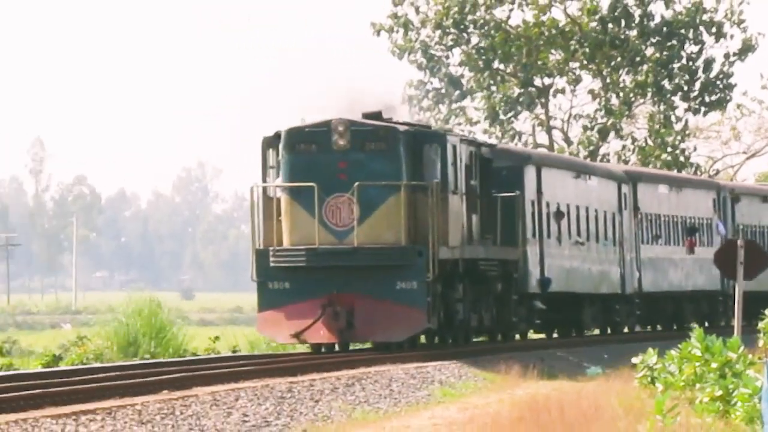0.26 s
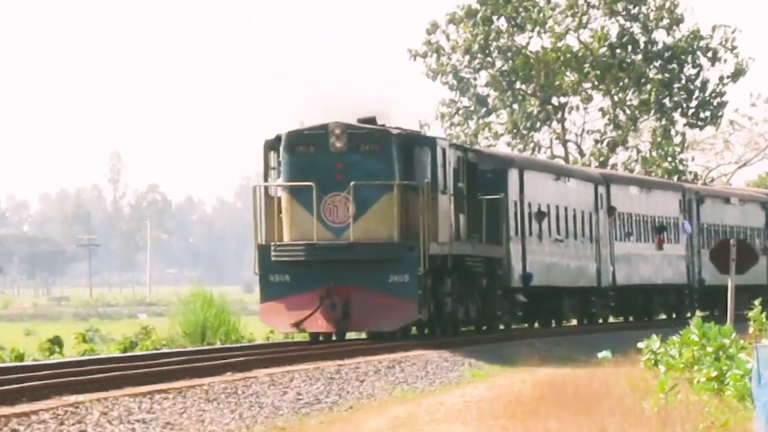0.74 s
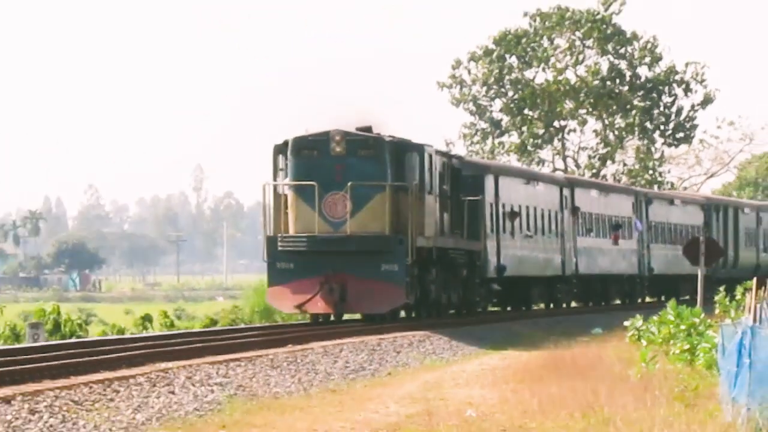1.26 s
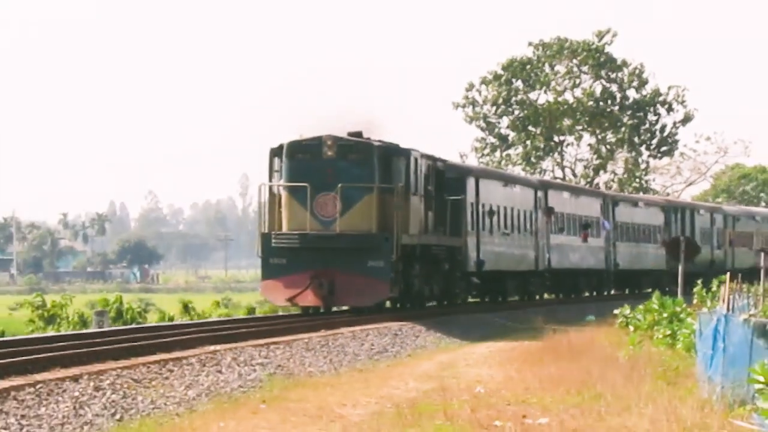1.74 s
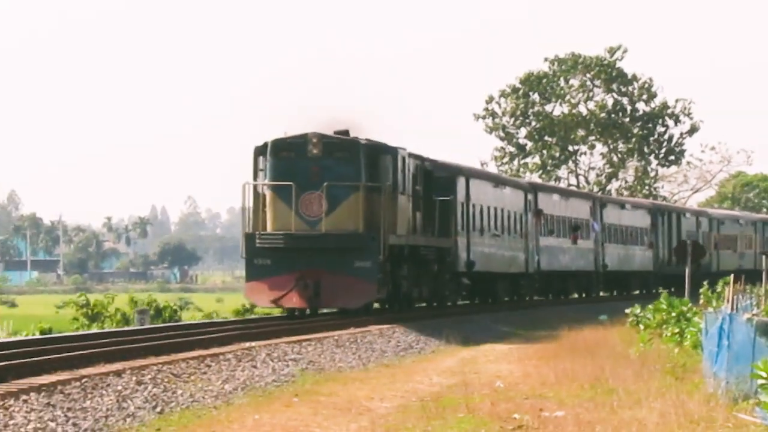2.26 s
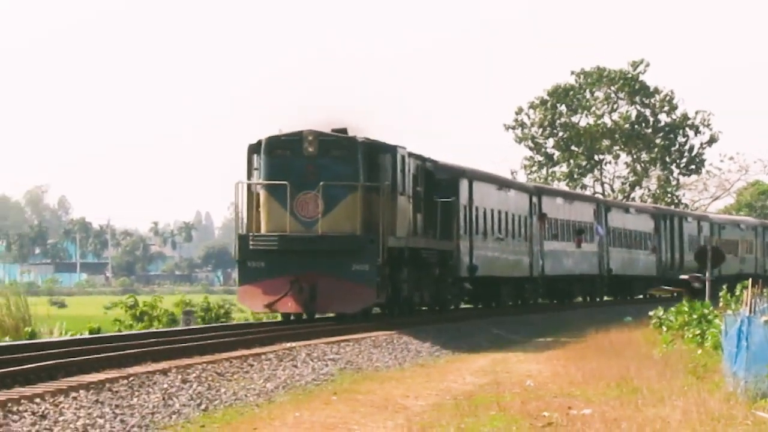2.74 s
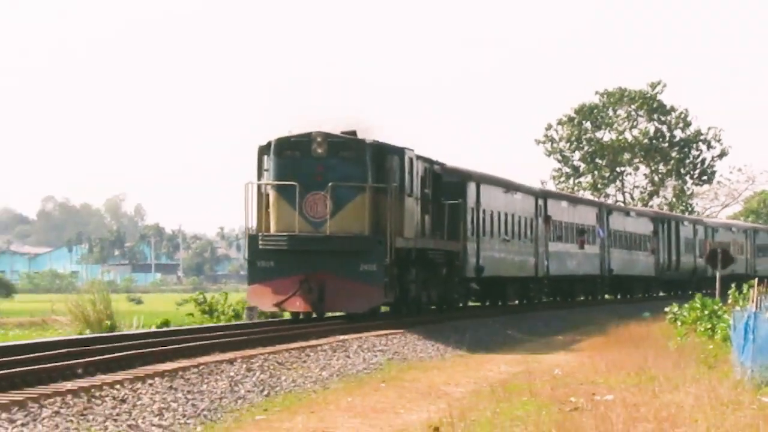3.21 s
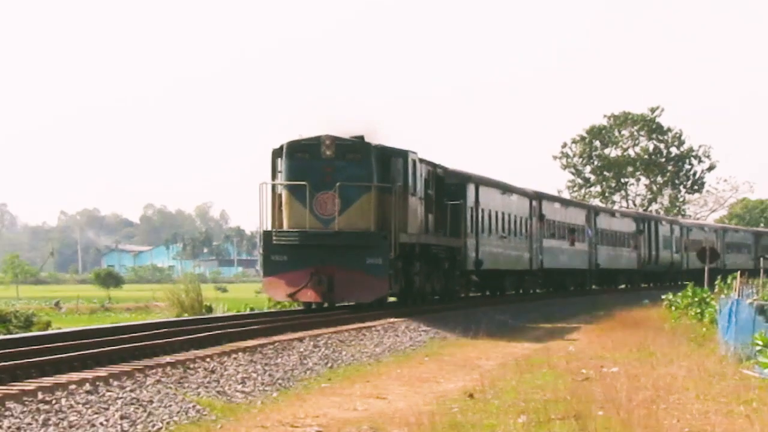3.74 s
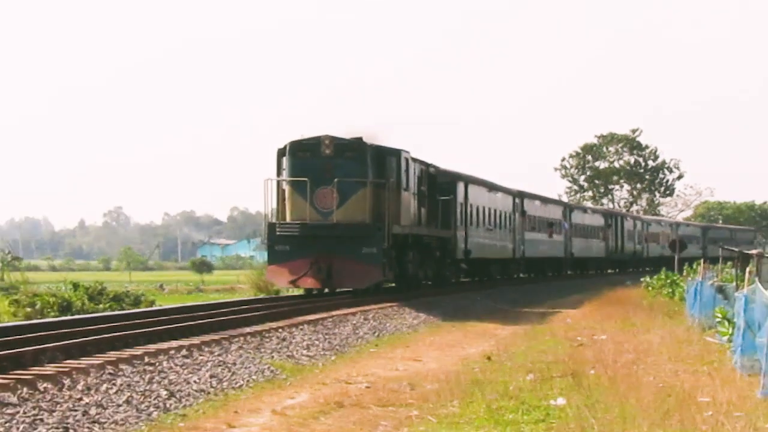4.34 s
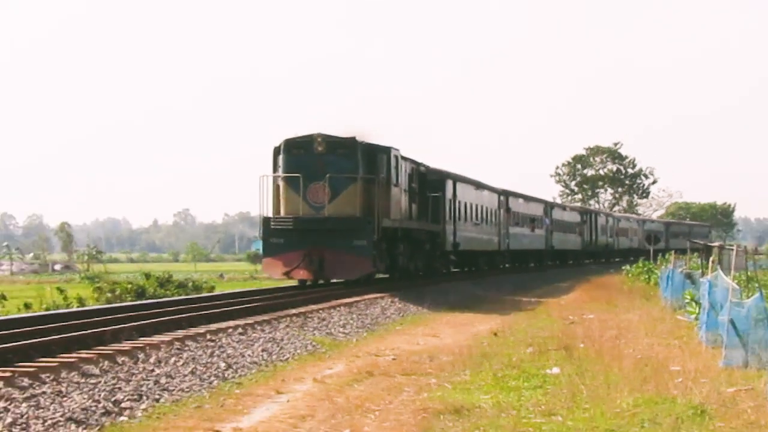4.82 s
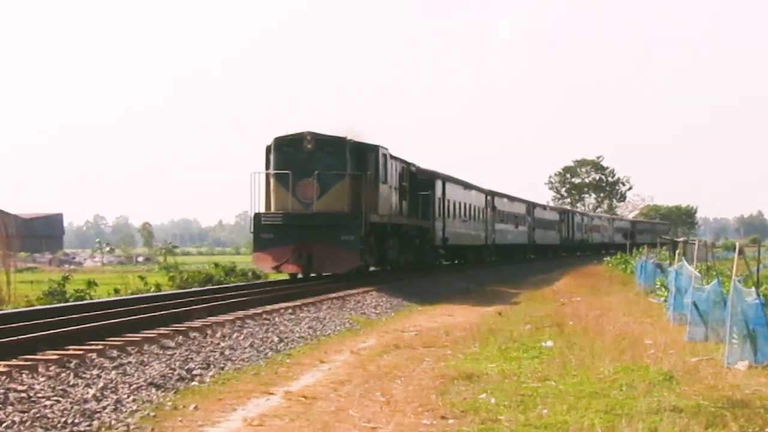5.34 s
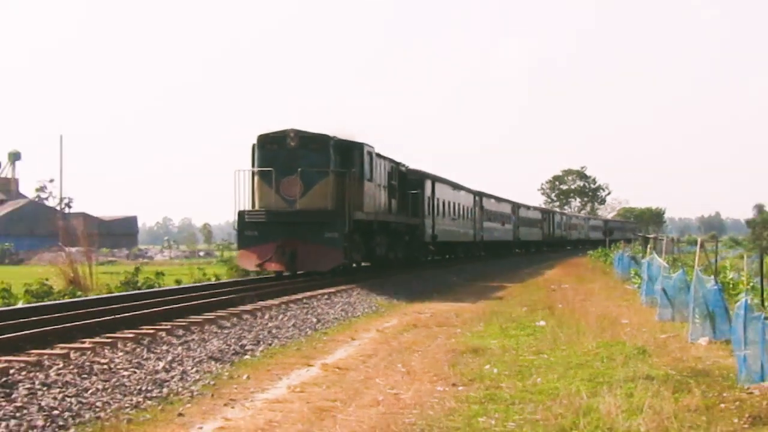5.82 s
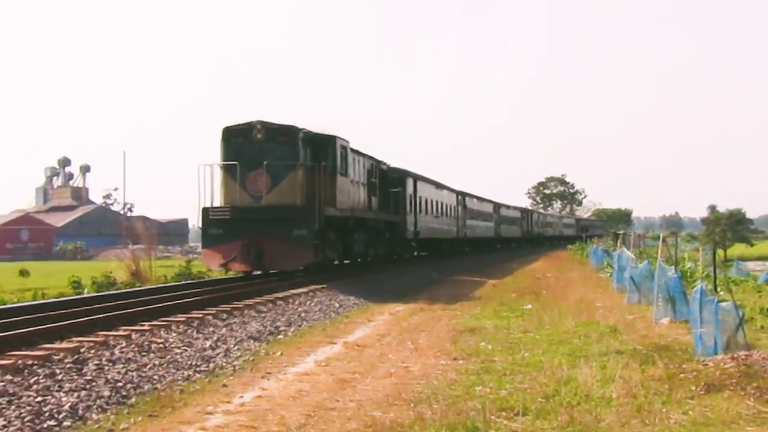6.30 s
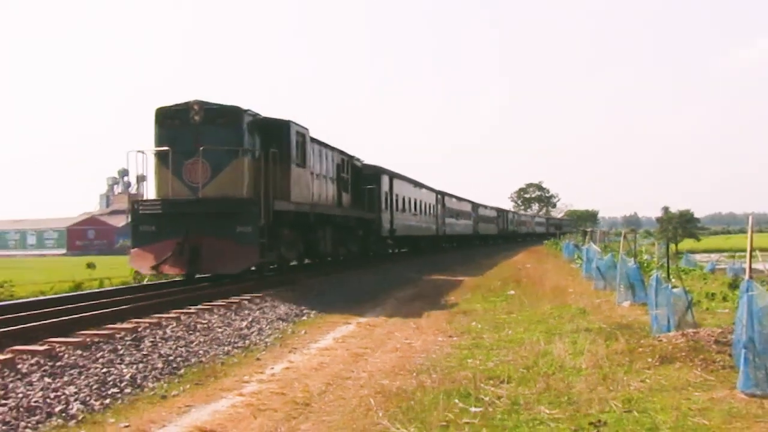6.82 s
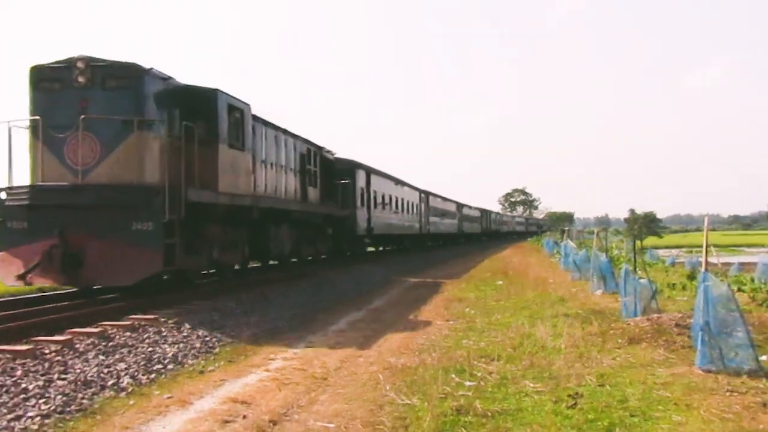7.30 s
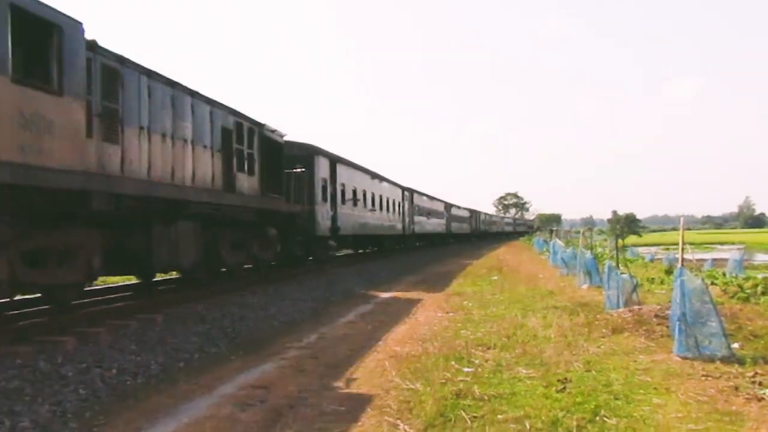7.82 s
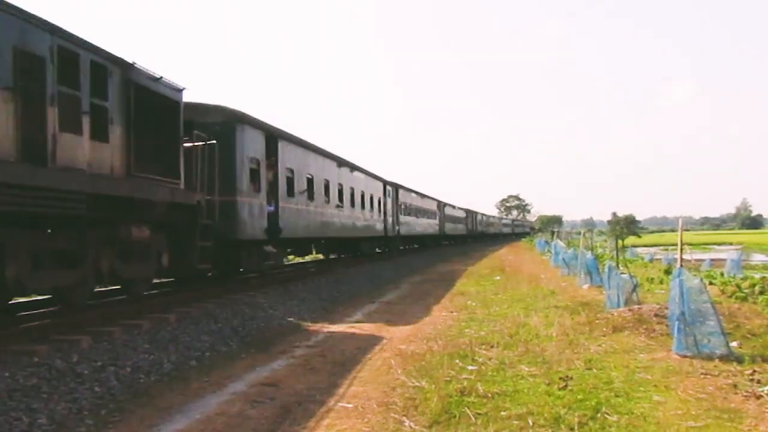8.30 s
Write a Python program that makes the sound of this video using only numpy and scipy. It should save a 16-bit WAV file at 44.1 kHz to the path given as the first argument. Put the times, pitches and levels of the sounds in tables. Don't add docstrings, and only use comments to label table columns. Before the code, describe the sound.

Outdoors beside a railway, a small handheld camera hears a distant diesel locomotive throb and rumble. A thin lens-motor whirr comes early, then stops. The train grows steadily louder, with rolling roar, leaking air hiss and dull wheel knocks. A click and brief dropout come near three seconds. As the engine draws level, its exhaust beat fades beneath wheel roar, wavering whines and a short burst of vented air.

```python
import sys
import numpy as np
from scipy import signal
from scipy.fft import rfft, irfft, next_fast_len
from scipy.io import wavfile
from scipy.ndimage import uniform_filter1d, minimum_filter1d

SR = 44100
rng = np.random.default_rng(int(sys.argv[2]) if len(sys.argv) > 2 else 0)


def voltage_ratio(level):
    return 10 ** (np.asarray(level, float) / 20)


def generate_wav(signal):
    frames = np.transpose(np.atleast_2d(signal))
    scaled = np.clip(frames, -1, 1) * 32767
    pcm = np.round(scaled).astype(np.int16)
    wavfile.write(sys.argv[1], SR, pcm)


N = 377055


def evened(x):
    return x / np.sqrt(np.mean(x ** 2) + 1e-20)


def curve(rows, t):
    rows = np.asarray(rows)
    return np.interp(t, rows[:, 0], rows[:, 1])


def level(rows):
    return voltage_ratio(curve(rows, np.arange(N) / SR))


def read(points, hz):
    f, db = np.transpose(points)
    return np.interp(np.log(hz + 1), np.log(f + 1), db, left=-90, right=-90)


def resonate(x, hz, width):
    pole = np.exp((2j * hz - width) * np.pi / SR)
    return 2 * signal.lfilter([1 - abs(pole)], [1, -pole], x).real


def shaped(x, gain):
    size = next_fast_len(len(x))
    hz = np.fft.rfftfreq(size, 1 / SR) + 1e-3
    return irfft(rfft(x, size) * gain(hz), size)[:len(x)]


def notched(x, dips):
    return shaped(x, lambda hz: voltage_ratio(-sum(db / (1 + ((hz - f) / w) ** 2) for f, w, db in dips)))


def band(hz, share):
    return evened(shaped(rng.standard_normal(N), lambda f: np.exp(-(np.log(f / hz) / share) ** 2)))


def add(mix, s, sound):
    part = mix[round(s * SR):][:len(sound)]
    part += sound[:len(part)]


def bursts(rows, rise_s, fall_s, share):
    lead_s = .01
    out = np.zeros(N)
    t = np.maximum(np.arange(4096) / SR - lead_s, 0)
    shape = (1 - np.exp(-t / rise_s)) * np.exp(-t / fall_s)
    for s, db, hz in rows:
        puff = rng.standard_normal(len(t)) * shape
        ring = shaped(puff, lambda f: np.exp(-(np.log(f / hz) / share) ** 2))
        add(out, s - lead_s, voltage_ratio(db) * ring / abs(ring).max())
    return out


# time in seconds, nearness [0-1].
NEARNESS = [(0, 0), (2.4, 0.28), (4, 0.33), (6.5, 0.64), (7.2, 0.78), (7.9, 0.91), (8.55, 1)]


def noise(spectra, size, patchy_db, flicker_db):
    hop = size // 4
    frames, hz = N // hop + 5, np.fft.rfftfreq(size, 1 / SR)
    real, imaginary, patches = rng.standard_normal((frames, len(hz), 3)).T
    patches = uniform_filter1d(patches, size=3, axis=0)
    patches = evened(uniform_filter1d(patches, size=2600 // hop, axis=1))
    flicker = evened(uniform_filter1d(rng.standard_normal(frames), size=1 + 500 // hop))
    step = 2 * np.clip(curve(NEARNESS, np.arange(frames) * hop / SR), 0, 1)
    shares = [np.maximum(1 - abs(step - k), 0) for k in range(len(spectra))]
    colour = voltage_ratio(sum(read(s, hz)[:, None] * share for s, share in zip(spectra, shares)))
    colour /= np.linalg.norm(colour, axis=0)
    z = (real + 1j * imaginary) * colour * voltage_ratio(patchy_db * patches + flicker_db * flicker)
    return evened(signal.istft(z, nperseg=size, noverlap=size - hop)[1][:N])


def rings(modes):
    nearness = curve(NEARNESS, np.arange(N) / SR) ** 2
    out = np.zeros(N)
    for hz, width, far_db, near_db in modes:
        ring = resonate(resonate(rng.standard_normal(N), hz, width), hz, width)
        out += voltage_ratio(far_db + (near_db - far_db) * nearness) * evened(ring)
    return out


# time in seconds, level in dB.
TRAIN_LOUDNESS = [(0, -35), (.3, -33), (.6, -32), (.9, -30.5), (1.5, -26), (1.8, -23), (2.1, -23),
                  (2.7, -20.5), (3.3, -19), (3.9, -18.5), (4.8, -16.5), (6, -15), (6.6, -17), (7.2, -17.5),
                  (8.55, -16.5)]


def follows(midway_db, share, db_per_s):
    t = np.arange(N) / SR
    midway_s, train_midway_db = 4.0, -18.5
    return midway_db + share * (curve(TRAIN_LOUDNESS, t) - train_midway_db) + db_per_s * (t - midway_s)


def throb_db():
    from_s, until_s, shaded_db = 6.42, 7.6, 10.5
    return -shaded_db * np.clip((np.arange(N) / SR - from_s) / (until_s - from_s), 0, 1)


# place in the engine cycle [0-1], blow in dB.
CYLINDER_BLOWS = [(0.0155, -9.3), (0.1314, -7.8), (0.2235, -2.0), (0.2953, -4.0), (0.4081, -5.9),
                  (0.4656, -8.4), (0.5697, 0.0), (0.6519, -8.7), (0.7203, -9.0), (0.8145, -5.8),
                  (0.8707, -4.9), (0.958, -4.2)]
# frequency in Hz, width in Hz, signed share.
PIPE_MODES = [(113.5, 23.0, 0.178), (148.3, 13.8, 0.411), (165.0, 71.8, -0.263), (236.7, 12.0, -0.197),
              (351.5, 14.0, -0.089), (325, 50, 0.2)]
# frequency in Hz, width in Hz, depth in dB.
SILENCER_DIPS = [(263, 6.6, 7), (299, 10.4, 15)]


def exhaust():
    cycle_hz, uneven_db = 5.5125, .9
    low_hz, high_hz = 56, 240
    place, db = np.transpose(CYLINDER_BLOWS)
    s = (np.arange(int(N / SR * cycle_hz))[:, None] + place) / cycle_hz
    s = s - (.4 - .1 * (s - 4.0) ** 2) / 1000
    blows = np.zeros(N)
    blows[np.round(s * SR).astype(int)] = voltage_ratio(db + uneven_db * rng.standard_normal(s.shape))
    pipe = sum(share * resonate(blows, hz, width) for hz, width, share in PIPE_MODES)
    pipe = shaped(pipe, lambda hz: 1 / (1 + (low_hz / hz) ** 4) / (1 + (hz / high_hz) ** 4))
    return evened(notched(pipe, SILENCER_DIPS)) * voltage_ratio(throb_db())


# frequency in Hz, density in dB per Hz.
RUMBLE_SPECTRA = [
    [(15, -77.7), (25, -52.7), (45, -53), (65, -10), (100, 0), (150, 1.5), (200, -11.5), (260, -8),
     (340, -14), (400, -21.5), (440, -40)],
    [(15, -72.9), (25, -47.9), (45, -54), (65, -11), (100, 0), (150, 0.0), (200, 0.5), (260, -16),
     (340, -7), (400, -22), (440, -48)],
    [(15, -54.3), (25, -32), (45, -40), (65, -16), (100, -2.5), (150, 3), (200, -0.5), (260, -8.5),
     (340, -6), (400, -5.5), (440, -24)],
]


def bass():
    throb_share_db = -2.6
    throb = voltage_ratio(throb_share_db) * exhaust()
    left = np.sqrt(np.clip(1 - voltage_ratio(2 * (throb_db() + throb_share_db)), .2, 1))
    rumble = left * noise(RUMBLE_SPECTRA, size=4096, patchy_db=0.45, flicker_db=0.4)
    return level(TRAIN_LOUDNESS) * (throb + rumble)


# frequency in Hz, density in dB per Hz.
ROAR_SPECTRA = [
    [(420, -15), (500, -10), (582, -11), (690, -1), (800, -4.5), (900, 1.5), (1150, -10), (1260, -10.5),
     (1380, -12.5), (1560, -4), (1740, -28), (2100, -33.5), (2300, -46.5), (2440, -40)],
    [(420, -3.5), (500, 1.5), (582, -5), (690, 0.7), (800, -2), (900, 1), (1150, -7.5), (1260, -10.5),
     (1380, -11), (1560, -10.5), (1740, -22), (2100, -25), (2300, -40.5), (2440, -39)],
    [(420, 0), (500, -5.5), (582, -5), (690, -7), (800, 0), (900, -5), (1150, -5), (1260, -9), (1380, -14),
     (1560, -9), (1740, -14.5), (2100, -19), (2300, -25), (2440, -16)],
]
# frequency in Hz, width in Hz, far level in dB, near level in dB.
RAIL_RINGS = [(793, 18, -43, -15), (1580, 16, -16, -40), (378.7, 16, -34, -18)]


def roar():
    rolling = noise(ROAR_SPECTRA, size=1024, patchy_db=0.85, flicker_db=0.92)
    return voltage_ratio(follows(midway_db=-27, share=0.82, db_per_s=0.51)) * (rolling + rings(RAIL_RINGS))


# start in seconds, end in seconds, air at start in dB, air at end in dB.
FILTER_OPENINGS = [
    (0, 0.603, -51.5, -48.5),
    (2.993, 3.062, -47, -36),
]


def opened():
    closing_db_per_s = 140
    t = np.arange(N) / SR
    gain = np.zeros(N)
    for start, end, first_db, last_db in FILTER_OPENINGS:
        air_db = np.interp(t, [start, end], [first_db, last_db])
        gain += (t >= start) * voltage_ratio(air_db - closing_db_per_s * np.maximum(t - end, 0))
    return gain


# frequency in Hz, density in dB per Hz.
DULL_SPECTRA = [
    [(2420, -34.8), (2460, -17), (2800, -2), (3600, -0.5), (4200, -3), (5300, -4), (5900, -0.5), (6500, -2),
     (7000, -7), (7100, -27.0)],
    [(2420, -33.3), (2460, -5), (2800, -5.5), (3600, -5.5), (4200, -6), (5300, -3.5), (5900, 1), (6500, -3),
     (7000, 0.5), (7100, -26)],
    [(2420, -26.9), (2460, -11), (2800, -0.3), (3600, -3), (4200, -5.5), (5300, -3.8), (5900, -2),
     (6500, -4), (7000, -1.5), (7100, -26.0)],
]
# frequency in Hz, density in dB per Hz.
BRIGHT_SPECTRA = [
    [(6950, -37.3), (7050, -14), (7600, -9.5), (8500, -12), (9600, -0.2), (10400, -1), (11400, -6),
     (12300, -11), (13500, -12), (14800, -14), (15300, -46)],
    [(6950, -38), (7050, -13.5), (7600, -9.5), (8500, -7), (9600, 0), (10400, -1.3), (11400, -7),
     (12300, -11), (13500, -15), (14800, -20), (15300, -45.3)],
    [(6950, -27.7), (7050, -5), (7600, 0.5), (8500, -0.5), (9600, -2), (10400, -3), (11400, -7.5),
     (12300, -12), (13500, -16), (14800, -25.2), (15300, -48)],
]
# frequency in Hz, width in Hz, far level in dB, near level in dB.
SINGING_RAILS = [(12385, 30, -23, -31), (12071, 30, -24, -30), (12715, 30, -19, -31), (7050, 15, -32, -30),
                 (5860, 30, -40, -28)]
# centre in seconds, half length in seconds, bright in dB, dull in dB.
AIR_GUSTS = [(1.62, .15, 0.5, -.6), (2.35, 0.13, 1.5, 1.5), (2.76, .06, 1.5, 3.5), (3.493, 0.14, 2.5, 0.5),
             (4.148, 0.23, 2, -1.2), (4.66, 0.1, 1, 0.5), (5.3, 0.18, 2.5, 0), (5.644, 0.12, 5.5, 1),
             (6.19, 0.14, 5, 0.2), (6.513, 0.1, 5, -0.2), (6.797, 0.071, -0.5, 2.5),
             (7.006, 0.056, -1.5, 2.5), (7.306, .12, 2, 1.5), (7.85, .15, 1.5, 0.7)]


def hiss():
    leak_s, leak_rise_s, leak_db = 2.59, 0.1, 6.5
    t = np.arange(N) / SR
    bright_db, dull_db = sum(np.outer(db, np.exp(-((t - s) / half) ** 4)) for s, half, *db in AIR_GUSTS)
    sharper = voltage_ratio(.6 * bright_db - 1.0) - 1
    bright_db = bright_db - leak_db * np.clip((leak_s + leak_rise_s - t) / leak_rise_s, 0, 1)
    dull_db = dull_db + follows(midway_db=-57, share=0.3, db_per_s=3.58)
    bright_db = bright_db + follows(midway_db=-45.5, share=0.47, db_per_s=1.2)
    dull = np.hypot(voltage_ratio(dull_db), voltage_ratio(-10) * opened())
    bright = np.hypot(voltage_ratio(bright_db), voltage_ratio(-13.5) * opened())
    dull = dull * noise(DULL_SPECTRA, size=512, patchy_db=1.5, flicker_db=1.1)
    jet = noise(BRIGHT_SPECTRA, size=512, patchy_db=2.0, flicker_db=0.97)
    jet = jet + sharper * shaped(jet, lambda hz: 1 / (1 + (11900 / hz) ** 24))
    return dull + bright * (jet + rings(SINGING_RAILS))


# time in seconds, whirr in dB.
LENS_MOTOR = [
    (.5, -90),
    (.6, -59),
    (.9, -64),
    (1.5, -61),
    (1.72, -55),
    (1.735, -90),
]


def camera():
    air = opened() * (band(1350, 0.56) + voltage_ratio(-12.5) * band(7700, .12))
    motor = level(LENS_MOTOR) * band(11000, 0.065)
    tone = voltage_ratio(-95) * np.sqrt(2) * np.sin(2 * np.pi * 11798 * np.arange(N) / SR)
    return air + motor + tone + voltage_ratio(-68) * band(9100, 0.093)


# start in seconds,
# peak in dB, pitch in Hz.
BRIGHT_SPITS = [(0.1744, -44.5, 6100), (0.2917, -37.5, 6040), (0.3511, -43, 5590), (0.4359, -36, 7550),
                (0.5312, -42, 4090), (3.0104, -32, 3500), (5.507, -20.5, 10100), (6.4417, -21, 9500),
                (6.4576, -15, 9300), (6.5435, -23, 9450), (6.7486, -32, 9690), (7.3644, -23, 9560),
                (7.3925, -20, 9300), (7.7199, -23, 10000), (0.5315, -39, 11000)]


def spits():
    return voltage_ratio(-1.5) * bursts(BRIGHT_SPITS, rise_s=0.00065, fall_s=0.0041, share=0.34)


# start in seconds, peak in dB, pitch in Hz.
JOINT_KNOCKS = [(2.381, -21, 883), (2.84, -12.5, 800), (2.972, -12.5, 735), (3.091, -13.5, 1040),
                (3.603, -10, 790), (3.63, -9.5, 1020), (5.573, -19, 888), (6.395, -13.5, 790),
                (6.679, -12, 700)]


def knocks():
    return voltage_ratio(-2.2) * bursts(JOINT_KNOCKS, rise_s=0.0027, fall_s=0.0098, share=0.24)


# centre in seconds, half length in seconds, pitch in Hz, level in dB.
BOGIE_TONES = [(7.0, .1, 799, -30), (7.17, .05, 800, -27), (7.37, .04, 798, -27), (7.5, .03, 792, -26),
               (7.67, .025, 791, -22), (7.8, .045, 790, -24), (7.94, .04, 797, -29), (8.35, .08, 768, -28),
               (8.5, .05, 800, -29), (7.93, .04, 1572, -36), (8.03, .05, 1575, -29), (8.22, .09, 1577, -35),
               (8.385, .035, 1532, -29), (8.52, .05, 1538, -33), (7.65, .04, 336, -27),
               (7.9, .05, 300, -25), (8.06, .05, 345, -26), (8.14, .05, 391, -26), (8.23, .04, 355, -25),
               (8.45, .09, 386, -25), (8.195, .035, 3570, -50), (3.053, .013, 1590, -25)]


def whine():
    waver_hz, width_hz = 3.07, 25
    t = np.arange(N) / SR
    waver = signal.lfilter([1], [1, -np.exp(-np.pi * width_hz / SR)], rng.standard_normal(N))
    drift = np.cumsum(waver_hz * evened(waver)) / SR
    out = np.zeros(N)
    for s, half, hz, db in BOGIE_TONES:
        swell = voltage_ratio(db) * np.exp(-((t - s) / half) ** 2)
        out += swell * np.sqrt(2) * np.sin(2 * np.pi * (hz * (t - s) + drift))
    return out


# time in seconds, level in dB.
VALVE_VENT = [(7.576, -62), (7.581, -36), (7.6, -25.5), (7.625, -32.5), (7.648, -38), (7.67, -32),
              (7.7, -39), (7.74, -43), (7.8, -60)]


def vent():
    t = np.arange(N) / SR
    lower = np.clip((t - VALVE_VENT[1][0]) / 0.074, .3, 1.1)
    jet = band(8900, 0.38) + 0.6 * lower * band(5800, 0.18)
    return level(VALVE_VENT) * jet * (t > VALVE_VENT[0][0]) * (t < VALVE_VENT[-1][0])


def scene():
    train = bass() + roar() + hiss()
    return (train + camera() + spits() + knocks() + whine() + vent())[None]


def limited(x):
    top = .5
    room = minimum_filter1d(top / np.maximum(abs(x), top), size=241)
    return x * uniform_filter1d(uniform_filter1d(room, size=121), size=121)


# frequency in Hz, width in Hz, depth in dB.
HOUSING_DIPS = [(582, 14.6, 6), (1387, 36.4, 12), (2456, 91, 12), (7870, 74, 17)]


def microphone(x):
    x = notched(x, HOUSING_DIPS)
    return shaped(x, lambda hz: 1 / np.sqrt(1 + (48 / hz) ** 6) / np.sqrt(1 + (hz / 15050) ** 120))


# start in seconds, end in seconds, depth in dB, click at start in dB, click
# at end in dB.
RECORDER_DUCKS = [
    (.5225, .5915, 14, -52, -50),
    (3.0012, 3.0708, 14, -13, -30),
]


def ducked(x):
    muted_s, eased_s = 0.0099, 0.036
    t = np.arange(N) / SR
    duck_db, clicks, eased = np.zeros(N), np.zeros(N), np.zeros(N)
    click = np.array([4., -4.])
    for start, end, depth_db, *click_db in RECORDER_DUCKS:
        duck_db += depth_db * (t > start) * (t < end)
        eased += (t > start + muted_s) * np.exp(-abs(t - start) / eased_s)
        for s, db in zip((start, end), click_db):
            add(clicks, s, voltage_ratio(db) * click)
    clicks = shaped(clicks, lambda hz: 3000 / hz * np.exp(-(np.log(hz / 5000) / 1.0) ** 4))
    middle = shaped(x, lambda hz: np.exp(-(np.log(hz / 4200) / 0.57) ** 4))
    high = shaped(x - middle, lambda hz: hz > 5000)
    low = shaped(x, lambda hz: 1 / (1 + (hz / 260) ** 4))
    rest = (x - middle - high - low) * voltage_ratio(-.9 * duck_db)
    low = low * voltage_ratio(-.82 * uniform_filter1d(duck_db, size=200))
    middle = middle * voltage_ratio((1.5 * eased - 1.14) * duck_db)
    high = high * voltage_ratio((.5 * eased - 0.6) * duck_db)
    return rest + low + middle + high + clicks


def top_cut(x):
    return signal.sosfilt(signal.butter(12, 14910, fs=SR, output="sos"), x)


def record(dry):
    mix = ducked(microphone(limited(dry[0])))[None]
    return top_cut(mix)


dry = scene()
out = record(dry)
generate_wav(out)
```